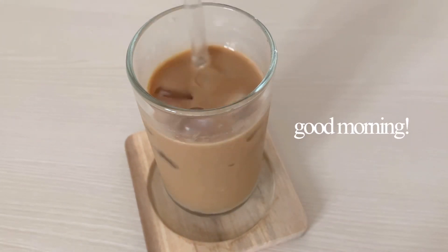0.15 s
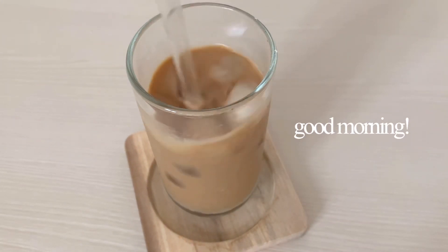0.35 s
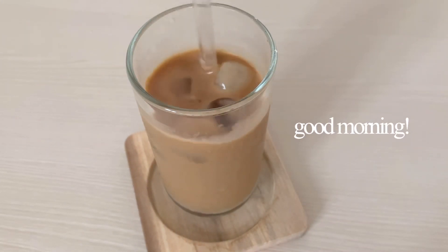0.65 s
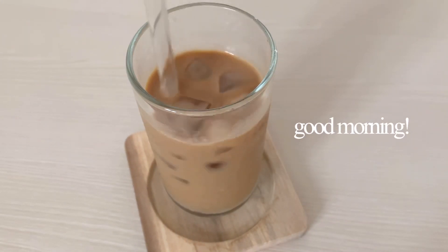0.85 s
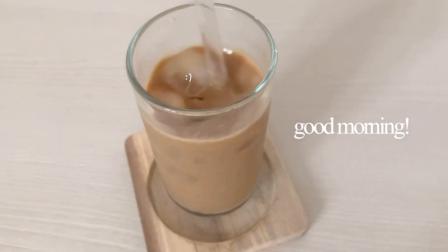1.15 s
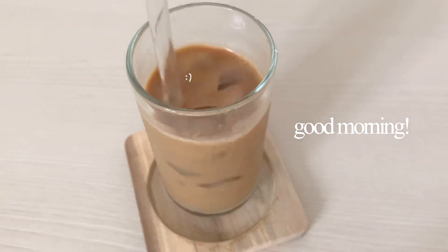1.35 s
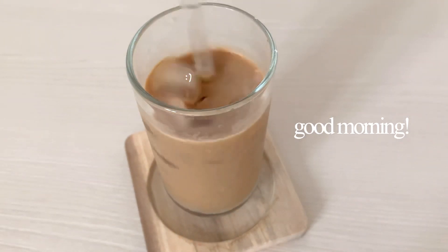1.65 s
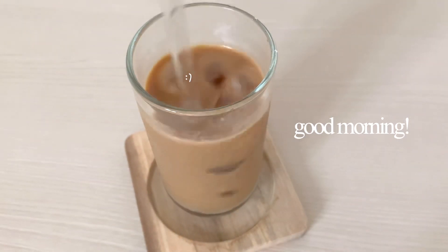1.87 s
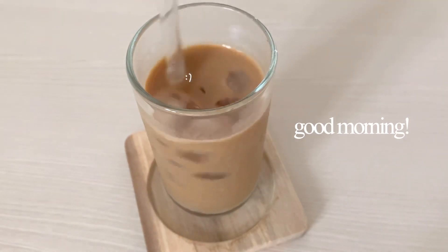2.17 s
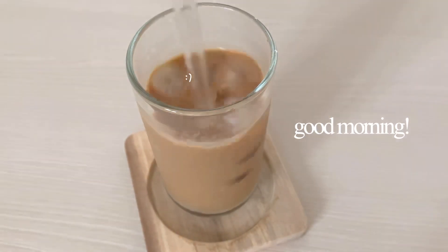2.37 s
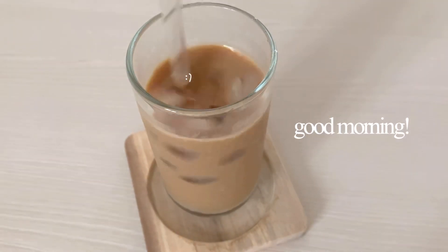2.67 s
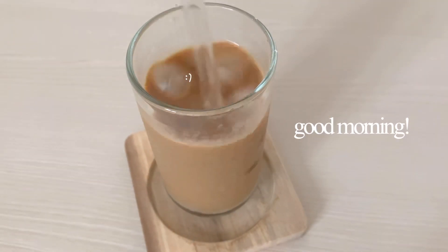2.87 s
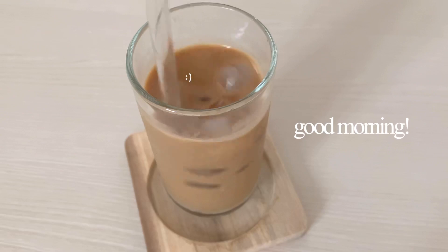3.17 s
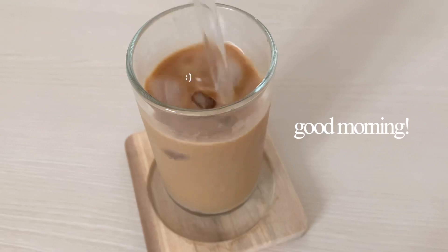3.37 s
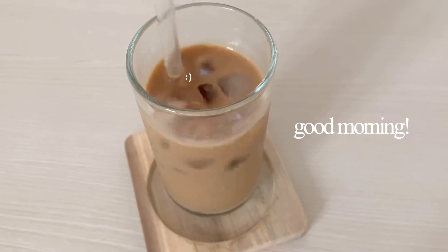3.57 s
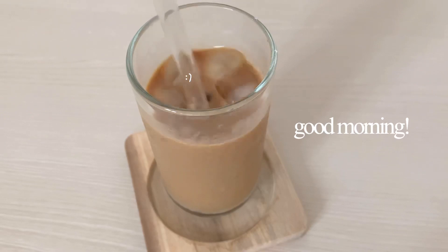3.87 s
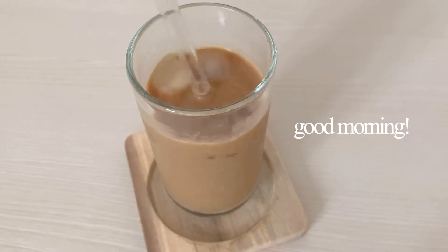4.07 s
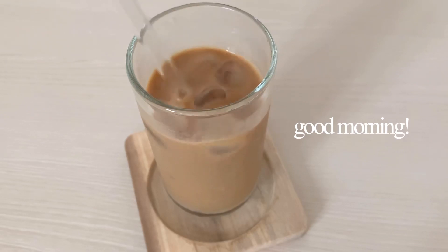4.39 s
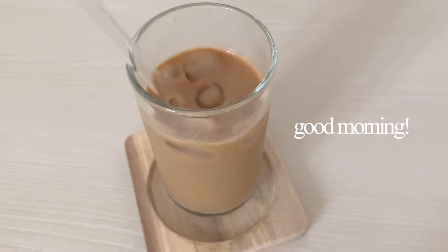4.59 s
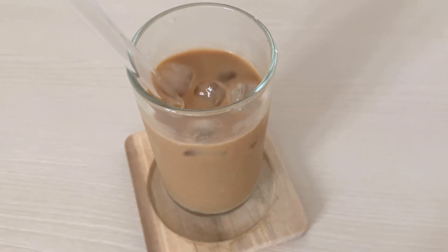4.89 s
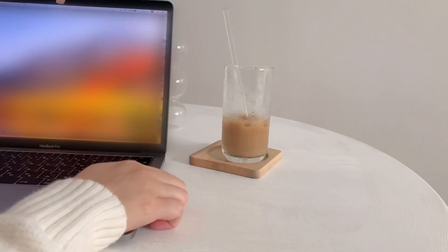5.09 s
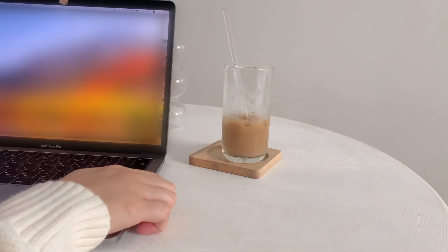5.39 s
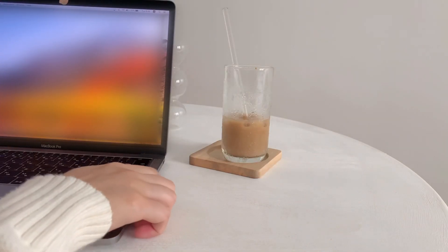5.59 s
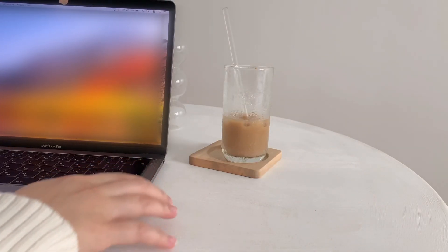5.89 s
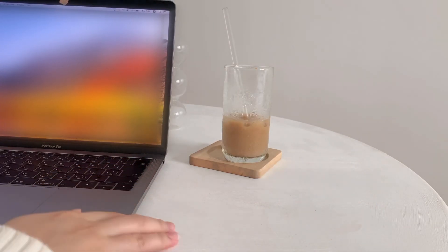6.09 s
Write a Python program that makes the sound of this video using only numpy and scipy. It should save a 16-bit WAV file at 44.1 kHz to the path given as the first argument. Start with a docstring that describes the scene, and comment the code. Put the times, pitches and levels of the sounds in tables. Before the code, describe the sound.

Ice cubes and a straw clink brightly against a glass as a milky drink is stirred, then an abrupt cut to quiet indoor fan hum.

```python
"""A stirred tall glass of milky drink close to a phone, then abruptly another place.
From 0 s: clinks of ice, straw and glass (damped modes plus noise cracks) ring in a small room over hiss,
swelling rumble, thuds and murmur (shaped noise); wall, cube, gulp, bump, knock and snap notes (decaying sines).
2.5-3.5 s: a low hum (unsteady sine). 4.478 s: the straw, let go, rings freely (sines of wavering level).
From 5.095 s: a wider room tone with fan hiss (stereo noise) and motor hum (wavering sine orders)."""
import sys
import numpy as np
from scipy import signal
from scipy.fft import rfft, irfft, next_fast_len
from scipy.io import wavfile
from scipy.ndimage import map_coordinates

SR = 44100
rng = np.random.default_rng(int(sys.argv[2]) if len(sys.argv) > 2 else 0)


def dump_mix(stems):
    """Bounce the given channels to the path in sys.argv[1] as a 16-bit WAV at rate SR."""
    frames = np.atleast_2d(stems).T  # one column per channel
    limited = np.clip(frames, -1, 1)  # hard clip at full scale
    pcm = np.round(limited * 32767).astype(np.int16)
    wavfile.write(sys.argv[1], SR, pcm)


N = 275303
LEAD = SR // 10  # samples kept ahead of 0 s, for sounds already under way
FAN_START_S = 5.095


def amp(db):
    """dB to gain."""
    return 10 ** (np.asarray(db) / 20)


def unit(x):
    """Scale to rms 1."""
    return x / np.sqrt(np.mean(x ** 2) + 1e-20)


def along(points, hz):
    """Interpolate (f/Hz, value) points on a log frequency axis."""
    f, value = np.transpose(points)
    return np.interp(np.log(hz + 1), np.log(f + 1), value)


def curves(rows):
    """One value per sample for each column after t/s."""
    s, *columns = np.transpose(rows)
    return [np.interp(np.arange(N) / SR, s, column) for column in columns]


def wobble(knots_per_s):
    """Smooth random curve through normal knots."""
    knots = rng.standard_normal(size=400)
    return map_coordinates(knots, [np.arange(N) * knots_per_s / SR], mode="mirror")


def filtered(x, response):
    """Apply a complex frequency response to x."""
    m = next_fast_len(N + SR // 2)
    return irfft(rfft(x, m) * response(np.fft.rfftfreq(m, 1 / SR)), m)[..., :N]


def ports(x, left_lag_s):
    """Delay left against right by left_lag_s; negative puts left first."""
    sides = np.array([[1], [-1]])
    return filtered(x, lambda hz: np.exp(-1j * np.pi * hz * left_lag_s * sides))


def rush(spectrum, alike):
    """Stereo noise of rms 1; a mid/side mix sets the left-right likeness per frequency."""
    def response(hz):
        angle = np.arccos(np.clip(along(alike, hz), -1, 1)) / 2
        return amp(along(spectrum, hz)) * [np.cos(angle), np.sin(angle)]

    mid, side = filtered(rng.standard_normal((2, N)), response)
    return unit(np.array([mid + side, mid - side]))


def notes(rows, t60_s, gain_db, lead, rise_s=0.00042):
    """One decaying sine per (t/s, level/dB, f/Hz) row; the result starts lead samples early."""
    out, t = np.zeros(N + SR), np.arange(SR // 4) / SR
    for s, db, hz in rows:
        envelope = amp(db + gain_db - 60 * t / t60_s) * (1 - np.exp(-t / rise_s))
        out[lead + round(s * SR):][:len(t)] += envelope * np.sin(2 * np.pi * hz * t)
    return out


# modes of the filled glass: f/Hz, level/dB, t60/s, left minus right/dB
GLASS_MODES = [(618, -6, 0.025, 9.5), (908, -7, 0.032, 4), (1948.4, -10.5, 0.073, 2.8),
               (2611, -6.5, 0.014, 13), (4040, -14, 0.028, -9), (4920, -17, 0.082, 7),
               (5154, -2, 0.022, -6), (5373, -6, 0.031, -5.5), (6210, -8, 0.016, -1.5),
               (7074, 2.5, 0.0092, -2), (7670, 2, 0.0078, -5), (8086, 3, 0.021, 4.5),
               (9900, -27.5, 0.0056, -18.5), (10113, 2.5, 0.0082, -1), (10930, -9.5, 0.013, -2.3),
               (11990, 8.5, 0.0077, 0.2), (13500, -16.5, 0.013, 2), (15600, -9, 0.015, 0.5)]
# colour of the contact noise: f/Hz, level/dB
CRACK_COLOUR = [(400, -11), (1400, -2.5), (2200, 8), (2650, -4), (3100, -2), (3800, -0.5), (6500, -6),
                (8800, -0.5), (12000, -19), (14000, 0.5), (16000, -38.5)]
# centres of the colour bands: f/Hz
FAMILY_HZ = [800, 2100, 4800, 7800, 12000]
FAVOUR_DB, FAVOUR_OCTAVES = 9.5, 0.031  # lift and width at the pitch that stands out
OWN_DB, OWN_T60_S = -7.5, 0.014  # extra tone at that pitch
BLOW, EDGE = 3072, 64  # samples per blow, guard samples for filtering


def clink(family_db, pitch_hz, scatter_db):
    """One blow: glass modes, detuned by the moving liquid, ring over a crack of the same colour."""
    def colour(f):
        octaves = np.log2((f + 1) / pitch_hz)
        favour = FAVOUR_DB * np.exp(-.5 * (octaves / FAVOUR_OCTAVES) ** 2)
        return along(list(zip(FAMILY_HZ, family_db)), f) + favour

    hz, db, t60, pan_db = np.transpose([*GLASS_MODES, (pitch_hz, OWN_DB, OWN_T60_S, 0)])
    t = np.arange(BLOW, dtype="float32") / SR
    size, detune, phase = rng.standard_normal(size=(3, len(hz)))
    level = amp(db + colour(hz) + scatter_db * size + np.outer([.5, -.5], pan_db))
    turn = np.float32(2 * np.pi * hz * (1 + 0.007 * detune))[:, None]
    fade = np.float32(np.log(1000) / t60)[:, None]
    phase = np.float32(0.7 * phase)[:, None]
    rings = level @ (np.exp(-fade * t) * np.sin(turn * t + phase))
    rings *= 1 - np.exp(-t / 0.00074)  # wet ice lands softly
    burst = amp(-60 * t / 0.018) * (1 - np.exp(-t / 0.0011)) * rng.standard_normal(BLOW)
    f = np.fft.rfftfreq(BLOW, 1 / SR)
    crack_gain = amp(colour(f) + along(CRACK_COLOUR, f) + 9.0)
    crack = irfft(rfft(np.roll(burst, EDGE)) * crack_gain, BLOW)[EDGE:]
    return rings + np.pad(crack, (0, EDGE))


# contacts of ice, straw, glass: t/s, strength/dB, extra body/dB, extra sharpness/dB, pitch that stands out/Hz
CLINKS = [(0.084, -41.5, -16, -18, 1950), (0.1433, -44, 5, 14, 5550), (0.2222, -29.5, -11, -3, 7990),
          (0.2256, -40, 4, 17, 7900), (0.2384, -27.5, -2.5, -16, 11500), (0.2485, -48.5, 5, 21, 2640),
          (0.2801, -36.5, -2, 6, 8050), (0.2968, -32, 4.5, 0, 5790), (0.323, -47.5, 6, 1, 4900),
          (0.3727, -45, 12.5, 5, 10300), (0.419, -46, 5.5, 4, 11800), (0.4347, -40, 7.5, -2.5, 3830),
          (0.4972, -47.5, 14, -1, 4170), (0.5505, -49, 9, 5, 11760), (0.58, -41.5, -2.5, -0.5, 10040),
          (0.6317, -46.5, 4, 14.5, 11400), (0.659, -45.5, 4, 2, 6370), (0.7888, -48.5, 9.5, -2, 5500),
          (0.857, -29.5, -14, 4, 2610), (0.869, -28, -11, -1.5, 7530), (0.879, -40.5, 10.5, 14, 11970),
          (0.9347, -30, -14.5, -3, 1960), (0.9636, -41, -1.5, 4, 11060), (0.982, -45, 10, 0, 6950),
          (1.066, -50, 10, 10, 10230), (1.139, -53, 7.5, 2, 6900), (1.1906, -42, 0, 1.5, 3870),
          (1.3739, -31, 0, 5, 10310), (1.537, -47, 9.5, -9, 3890), (1.6109, -45.5, 2.5, -5, 10400),
          (1.6329, -49.5, 11.5, 7.5, 5780), (1.8288, -47.5, -3, 3, 4930), (1.86, -51.5, 8.5, 5, 4600),
          (1.92, -48, 5, -5, 6760), (1.9443, -39.5, 5.5, 5.5, 6050), (2.032, -43, -12, -3, 1920),
          (2.1323, -42.5, -5, -7.5, 5320), (2.2748, -33, -9.5, 2.5, 12040), (2.284, -47, 14.5, 8.5, 4730),
          (2.319, -50, 13.5, 10.5, 5010), (2.392, -43.5, 3, 1, 5130), (2.4387, -44.5, -4.5, 11.5, 12400),
          (2.4629, -45.5, 6.5, 10.5, 6100), (2.51, -30.5, -0.5, 14, 6470), (2.529, -44.5, 1.5, -2.5, 5170),
          (2.5467, -46.5, 12, 6, 5040), (2.61, -21.5, -15.5, 8, 12400), (2.621, -41, -2.5, 1, 7000),
          (2.794, -44.5, 3, -9, 11910), (2.8474, -48.5, 4.5, -10.5, 5320), (2.8915, -51, 13, -11, 10150),
          (2.899, -40, -1.5, 8, 4680), (3.0265, -46, 7.5, 5, 5260), (3.0465, -43.5, 7, 5, 5110),
          (3.083, -23, -10, 17, 5254), (3.096, -32, -10.5, 12, 5130), (3.1255, -45.5, -17, 13.5, 8500),
          (3.2143, -28.5, -8.5, 5, 8160), (3.339, -29.5, -2, 8, 7770), (3.358, -44.5, -8, -7, 5120),
          (3.488, -35, -13, -1, 5300), (3.5972, -31, -12.5, 2, 8060), (3.733, -49, -4, 9.5, 6100),
          (3.7494, -41, -0.5, 10.5, 7760), (3.796, -45.5, -1.5, 10.5, 8930), (3.928, -48, 10.5, -8, 10070),
          (4.0285, -25.5, -7, 2, 8030), (4.0413, -28.5, -21, -9, 1990), (4.1227, -39, 2, -6, 5260),
          (4.201, -39, -9, -3.5, 5470), (4.2281, -38, 1, 4.5, 7920), (4.2964, -41.5, -0.5, 1, 5340),
          (4.4763, -21.5, -9, 4, 11760), (4.4993, -36, 5, 8, 5420), (4.5227, -41.5, 7, 18.5, 4600),
          (4.619, -42, 2, -11, 5000), (4.697, -49.5, 0, -14, 5440), (4.7207, -44, -5, -7, 4980),
          (4.73, -43.5, -4, -4.5, 4760), (4.8474, -52.5, -22, -6.5, 7050), (4.8662, -46.5, -6, 2, 9950),
          (4.895, -49.5, 10.5, -13, 10000)]
# one clink before 0 s, still ringing in the room; columns as CLINKS
EARLIER_CLINK = (-0.05, -24.5, 1.5, -4.5, 10200)
# colour of a usual contact per FAMILY_HZ band: level/dB
USUAL_DB = [-16, -1, -1.5, -0.5, -8]
# share of the extra body each band takes: [ratio]
BODY_SHARE = [0.85, 0.87, 0.17, 0, 0.17]
# share of the extra sharpness each band takes: [ratio]
SHARP_SHARE = [0.15, 0.15, 0.096, 0.73, 0.98]
TICKS, STIR_END_S = 55, 4.85
TICK_DB, TICK_SPREAD_DB, TICK_COLOUR_DB = -63, 2.5, 5


def ice():
    """Clinks, each with a softer tick just before and two faint bounces; ticks of drifting ice; from -LEAD."""
    out = np.zeros((2, N + SR))

    def family(db, body, sharp):
        return db + np.add(USUAL_DB, body * np.array(BODY_SHARE) + sharp * np.array(SHARP_SHARE))

    def add(s, blow):
        out[:, LEAD + round(s * SR):][:, :BLOW] += blow

    for s, *strike, pitch_hz in [EARLIER_CLINK, *CLINKS]:
        # t/s, gain/dB, mode scatter/dB
        blows = [(s - .0035, -24, 5), (s - .0003, 2.2, 2.4)]
        for after, weaker in rng.exponential(size=(2, 2)):
            blows.append((s + 0.0054 + 0.018 * after, -13 - 6 * after - 4 * weaker, 5))
        for at, db, scatter_db in blows:
            add(at, amp(db) * clink(family(*strike), pitch_hz, scatter_db))
    for s in rng.uniform(0, STIR_END_S, size=TICKS):
        spread = [TICK_SPREAD_DB, TICK_COLOUR_DB, TICK_COLOUR_DB]
        size, body, sharp = rng.standard_normal(size=3) * spread
        pitch_hz = rng.uniform(2200, 7700)
        add(s, clink(family(TICK_DB + size, body, sharp), pitch_hz, scatter_db=7.5))
    return out


# small room decay: f/Hz, t60/s
ROOM_DECAY = [(500, 0.052), (2000, 0.45), (5000, 0.49), (10000, 0.38), (16000, 0.27)]
# small room colour: f/Hz, level/dB
ROOM_COLOUR = [(500, 20), (1400, 1.5), (1790, 2), (1950, 1.5), (2130, -4.5), (2550, -2), (3100, -2),
               (4000, 0), (4500, -4), (5300, 3.5), (5900, -6.5), (7000, -6), (8100, -16.5), (10400, -2.5),
               (12000, -9.5), (16000, -4.5)]


def room(x):
    """Noise tail with its own t60 at each frequency, drawn anew every quarter second."""
    out, step = np.zeros((2, x.shape[1] + SR)), SR // 4
    for start in range(0, round(FAN_START_S * SR), step):
        hz, t, z = signal.stft(rng.standard_normal((2, SR // 2)), SR, nperseg=256)
        decay = amp(-60 * t / along(ROOM_DECAY, hz)[:, None])
        tail = signal.istft(z * decay, SR, nperseg=256)[1]
        tail *= 1 - np.exp(-np.arange(tail.shape[1]) / SR / 0.00098)  # reflections build up
        wet = signal.fftconvolve(x[:, start:start + step], tail * amp(-37.0), axes=1)
        out[:, start:][:, :wet.shape[1]] += wet
    return filtered(out[:, LEAD:LEAD + N], lambda hz: amp(along(ROOM_COLOUR, hz)))


# thuds of the glass through the table: t/s, thud level/dB, liquid murmur level/dB, hold/s
THUDS = [(-.02, -57, -63.5, 0.02), (0.217, -59.5, -60, 0.19), (0.418, -53, -56, 0.017),
         (0.657, -59.5, -64, 0.046), (0.847, -56, -59, 0.063), (1.203, -64, -85, 0.03),
         (1.398, -90, -65.5, 0.028), (1.95, -68.5, -65.5, 0.052), (2.28, -64.5, -63.5, 0.076),
         (2.382, -48.5, -55, 0.016), (2.507, -53, -52, 0.031), (2.605, -50.5, -57, 0.027),
         (2.687, -67, -70, 0.31), (3.078, -44.5, -48.5, 0.018), (3.348, -62.5, -66.5, 0.074),
         (3.61, -64.5, -67.5, 0.24), (3.925, -56.5, -59, 0.19), (4.278, -62, -63, 0.039),
         (4.483, -48, -50.5, 0.054)]
THUD_ATTACK_S = 0.0075


def thudding(column, t60_s, rest_db):
    """Amplitude of all thuds: attack, hold and decay, summed in power over a resting level."""
    power = np.full(N, amp(rest_db) ** 2)
    for row in THUDS:
        onset_s, hold_s = row[0], row[-1]
        start = max(round(onset_s * SR), 0)
        t = np.arange(start, min(start + SR, N)) / SR - onset_s
        decay = amp(row[column] - 60 * np.maximum(t - hold_s, 0) / t60_s)
        power[start:start + len(t)] += (np.clip(t / THUD_ATTACK_S, 0, 1) * decay) ** 2
    return np.sqrt(power)


# left-right likeness of the near noises: f/Hz, likeness [ratio]
NEAR_ALIKE = [(60, 0.89), (150, 0.95), (300, 0.66), (700, 0.22), (1500, 0.16)]
# deep rumble level: t/s, level/dB
DEEP_LEVEL = [(0.0, -71), (0.69, -79), (0.86, -60.5), (1.11, -68), (2.23, -82), (2.71, -60), (3.06, -77),
              (3.09, -67), (3.7, -79.5), (4.01, -81), (4.34, -78), (4.49, -72), (4.85, -82), (5.09, -78)]
# deep rumble spectrum: f/Hz, relative level/dB per Hz
DEEP_SPECTRUM = [(25, -45.5), (42, -6.5), (60, 0.5), (85, -14), (120, -42), (400, -120)]
# table thud spectrum: f/Hz, relative level/dB per Hz
THUD_SPECTRUM = [(40, -49.5), (85, -5), (130, -2), (232, -10), (350, -11.5), (520, -45.5), (880, -120)]


def rumble():
    """Deep noise that swells and fades, plus wavering thuds through the table."""
    deep_db, = curves(DEEP_LEVEL)
    thuds = thudding(column=1, t60_s=0.56, rest_db=-70.5) * amp(2.2 * wobble(25))
    return amp(deep_db) * rush(DEEP_SPECTRUM, NEAR_ALIKE) + thuds * rush(THUD_SPECTRUM, NEAR_ALIKE)


# stirred liquid: f/Hz, relative level/dB per Hz
SLOSH_SPECTRUM = [(150, -35), (300, -11), (553, 0), (660, 1), (950, -9.5), (1200, -18.5), (2200, -15),
                  (3700, -120)]
# glass wall singing while the liquid moves: f/Hz, relative level/dB per Hz
SINGING_SPECTRUM = [(1800, -120), (1880, -20), (1950, -3), (2030, -17), (2120, -120)]


def murmur():
    """Liquid noise and a narrow singing band of the wall, under one wavering envelope."""
    level = thudding(column=2, t60_s=0.51, rest_db=-71.5) * amp(2.5 * wobble(30))
    singing = amp(-8.5) * rush(SINGING_SPECTRUM, NEAR_ALIKE)
    return level * (rush(SLOSH_SPECTRUM, NEAR_ALIKE) + singing)


# faint steady floor: f/Hz, relative level/dB per Hz
HISS_SPECTRUM = [(1500, -4), (3000, -11.5), (6000, -22), (9000, -16.5), (13000, -14), (16500, -33)]


def hiss():
    """Steady treble noise."""
    return amp(-78.0) * rush([(900, -60), *HISS_SPECTRUM], NEAR_ALIKE)


# ice on the wall: t/s, relative level/dB, f/Hz of the short tone
WALL_HITS = [(0.2244, -59, 1920), (0.2987, -38.5, 1947), (0.3721, -49, 1840), (0.4204, -52, 2060),
             (0.4978, -38, 2010), (0.556, -49, 2000), (0.668, -48.5, 2006), (0.735, -53, 1940),
             (0.7731, -47, 1930), (0.8689, -36, 2026), (1.1912, -46.5, 2030), (1.3763, -44.5, 2104),
             (1.5369, -48, 2020), (1.8322, -48.5, 2040), (1.945, -42.5, 1986), (2.2757, -47.5, 1943),
             (2.5107, -37.5, 1885), (2.61, -39.5, 2015), (2.8489, -45, 1996), (3.0515, -45.5, 1990),
             (3.2141, -50, 1924), (3.3388, -45.5, 2060), (3.488, -46, 2045), (4.0362, -33.5, 2017),
             (4.3485, -48, 1983), (4.4772, -34, 2008)]
LONG_HZ, LONG_T60_S = 1960, 0.19


def wall():
    """A short clear wall tone and a longer one near LONG_HZ start with each hit; both mono, from -LEAD."""
    short = notes(WALL_HITS, t60_s=0.058, gain_db=-0.5, lead=LEAD)
    detune = 1 + .011 * rng.standard_normal(len(WALL_HITS))  # small random detuning per hit
    rows = [(s, db, LONG_HZ * k) for (s, db, _), k in zip(WALL_HITS, detune)]
    long = notes(rows, LONG_T60_S, gain_db=-12, lead=LEAD)
    unsteady_level = np.pad(amp(3.5 * wobble(45)), (LEAD, SR - LEAD), mode="edge")
    return short, long * unsteady_level


# cube on cube: t/s, relative level/dB, f/Hz
CUBE_HITS = [(0.2248, -31, 2490), (0.296, -36, 3920), (0.4349, -49, 3800), (0.4986, -46, 2660),
             (0.6592, -39.5, 4060), (0.8579, -35, 4000), (1.1383, -49.5, 3650), (1.189, -40.5, 4100),
             (1.3735, -35, 4130), (1.8312, -51, 4150), (1.943, -41, 3900), (2.275, -44, 4240),
             (2.4638, -46, 4050), (2.5097, -38.5, 3800), (2.609, -31.5, 4004), (2.898, -46, 4050),
             (3.0834, -36, 4070), (3.2136, -40, 4260), (3.3378, -32.5, 2560), (3.487, -46, 2590),
             (3.5962, -55, 2480), (4.03, -37, 2500), (4.1225, -35, 3870), (4.2009, -44, 3840),
             (4.23, -35, 2530), (4.2953, -39, 4000), (4.4762, -38, 3940), (4.866, -49.5, 3970)]


def cubes():
    """Short hollow decaying sines; from -LEAD."""
    return notes(CUBE_HITS, t60_s=0.02, gain_db=4.5, lead=LEAD)


# liquid slaps that trap air: t/s, relative level/dB, f/Hz
GULPS = [(0.226, -44, 713), (0.296, -53, 802), (0.374, -48.5, 554), (0.438, -44.5, 697), (0.857, -48, 935),
         (1.377, -52, 888), (2.392, -49.5, 622), (2.513, -42.5, 574), (2.613, -49, 654),
         (3.086, -42.5, 651), (3.341, -50.5, 908), (3.933, -46, 541), (4.092, -43.5, 592),
         (4.231, -52.5, 960)]


def gulps():
    """Decaying sines of trapped air, louder on the left."""
    tones = notes(GULPS, t60_s=0.082, gain_db=-0.6, rise_s=0.0021, lead=0)[:N]
    return tones * amp([[2.2], [-2.2]])


# low answers of the table: t/s, relative level/dB, f/Hz
BUMPS = [(0.302, -43, 107), (0.379, -49.5, 130.5), (0.469, -48.5, 135.7), (0.867, -45.5, 126),
         (1.224, -51.5, 153), (2.391, -42.5, 128.2), (2.516, -45, 96.9), (2.615, -40, 144),
         (3.088, -37, 134.2), (3.946, -46, 131.6), (4.008, -49, 105), (4.488, -35, 129.5)]


def bumps():
    """Slow-rising low sines with wavering level."""
    tones = notes(BUMPS, t60_s=0.31, gain_db=-2.0, rise_s=0.01, lead=0)[:N]
    return tones * amp(1.8 * wobble(22))


# glass rocking on its coaster: t/s, relative level/dB, f/Hz
KNOCKS = [(0.436, -46.5, 266), (2.39, -42, 329), (2.429, -45, 306), (3.087, -41.5, 285),
          (3.939, -49.5, 293), (4.484, -39, 188), (5.066, -51, 282)]


def knocks():
    """Damped low-mid sines of the rocking glass."""
    return notes(KNOCKS, t60_s=0.11, gain_db=-3.0, rise_s=.003, lead=0)[:N]


# hard hits: t/s, relative level/dB, f/Hz
SNAPS = [(2.6098, -11.5, 7500), (2.6098, -11.5, 12100), (3.0832, -12.5, 6800), (3.0832, -13.5, 12000),
         (1.3742, -21, 12000)]


def snaps():
    """Very short dry treble sines; from -LEAD."""
    return notes(SNAPS, t60_s=0.013, gain_db=0, lead=LEAD)


# passing low hum: start/s, end/s, f/Hz, level/dB
DRONE = (2.5, 3.5, 165, -59.5)


def drone():
    """Low sine, slightly unsteady in pitch and level, under one swell."""
    start, end, hz, db = DRONE
    t = np.arange(N) / SR
    progress = np.clip((t - start) / (end - start), 0, 1)
    swell = np.sqrt(np.clip(np.sin(np.pi * progress), 0, 1))
    phase = 2 * np.pi * hz * np.cumsum(1 + .02 * wobble(15.3)) / SR
    return amp(db + 2 * wobble(22)) * swell * np.sin(phase)


# straw modes: f/Hz, relative level/dB, t60/s, rise/s
STRAW_MODES = [(932, -4, 0.47, 0.029), (1915, 0, 0.46, .01), (5394, -2, 0.52, .003),
               (5400, 6.5, 0.17, 0.0033)]
LET_GO_S, LET_GO_DB = 4.478, -42.5


def straw():
    """Let go against the rim, the straw rings freely: decaying sines of wavering level."""
    t = np.maximum(np.arange(N) / SR - LET_GO_S, 0)
    ring = np.zeros(N)
    for hz, db, t60, rise in STRAW_MODES:
        envelope = amp(db - 60 * t / t60 + 6.2 * wobble(27.13)) * (1 - np.exp(-t / rise))
        ring += envelope * np.sin(2 * np.pi * hz * t)
    return amp(LET_GO_DB) * ring


# fan air: f/Hz, relative level/dB per Hz
FAN_SPECTRUM = [(25, -30), (65, -14.5), (100, -21), (131, -11.5), (210, -4), (280, -10.5), (1030, -6.5),
                (3200, -19.5), (6900, -29.5), (10000, -31.5), (15200, -36), (16500, -50)]
# fan air left-right likeness: f/Hz, likeness [ratio]
FAN_ALIKE = [(60, 0.85), (200, 1), (600, 0.19), (2000, 0.18), (8000, 0.11)]
# fan air balance: f/Hz, left minus right/dB
FAN_PAN = [(60, 9), (180, 1), (550, 5), (1650, 1.5), (4970, 0), (15000, -0.5)]
# motor orders 2 and 3: t/s, order 2 relative level/dB, order 3 relative level/dB
HUM_LEVEL = [(5.1, -64, -56), (5.138, -65.5, -53), (5.876, -60, -61.5), (5.908, -60, -84),
             (5.978, -58.5, -61), (6.21, -63.5, -66), (6.24, -63, -81)]
# other motor orders: multiple of MOTOR_HZ [ratio]
MOTOR_ORDERS = [1, 5, 7, 8, 10]
# their levels: relative level/dB
MOTOR_DB = [-79, -71.5, -71, -70.5, -70]
FAN_DB, MOTOR_HZ = -50.0, 70.9


def fan():
    """Broad air noise and sine orders of a motor whose speed wavers."""
    air = ports(rush(FAN_SPECTRUM, FAN_ALIKE), left_lag_s=0.00031)
    air = filtered(air, lambda hz: amp(along(FAN_PAN, hz) / 2 * np.array([[1], [-1]])))
    turn = 2 * np.pi * np.cumsum(MOTOR_HZ * (1 + 0.00389 * wobble(6))) / SR
    second_db, third_db = curves(HUM_LEVEL)
    hum = amp(second_db + 2.5) * np.sin(2 * turn) + amp(third_db + 2.5) * np.sin(3 * turn)
    for order, db in zip(MOTOR_ORDERS, MOTOR_DB):
        hum += amp(db + 4.5 + 3.5 * wobble(12)) * np.sin(order * turn)
    return amp(FAN_DB + .6 * wobble(5)) * air + hum


def scene():
    """The glass in its small room, then an abrupt change to the fan."""
    span = slice(LEAD, LEAD + N)
    clinks, cube_notes = ice(), cubes()
    wall_short, wall_long = wall()
    wall_pair = (wall_short + wall_long) * amp([[.6], [-.6]])
    hits = (clinks + cube_notes + snaps())[:, span] + straw()
    direct = ports(hits, left_lag_s=-0.0001833) + ports(wall_pair[:, span], left_lag_s=-0.000083)
    wet = room(clinks + amp(-8.5) * cube_notes + amp(4.5) * wall_long)
    undertone = rumble() + murmur() + hiss() + gulps() + bumps() + knocks()
    near = direct + wet + undertone + drone()
    later = np.clip((np.arange(N) / SR - FAN_START_S) / 0.0018, 0, 1)
    return near * (1 - later) + fan() * later


# deaf spots of the phone: centre f/Hz, width/Hz, level/dB
DEAF_SPOTS = [(8540, 620, -9), (13250, 600, -11)]
TOP_HZ = 16900


def record(dry):
    """Phone response: two treble dips and a sharp cut at TOP_HZ."""
    def response(hz):
        dips_db = sum(db * np.exp(-.5 * ((hz - centre) / width) ** 2) for centre, width, db in DEAF_SPOTS)
        return (hz < TOP_HZ) * amp(dips_db)

    return filtered(dry, response)


dry = scene()
out = record(dry)
dump_mix(out)
```